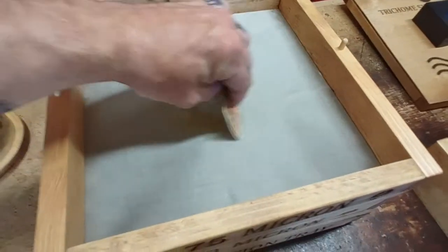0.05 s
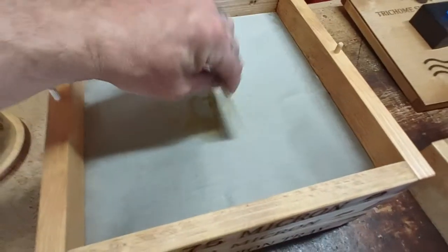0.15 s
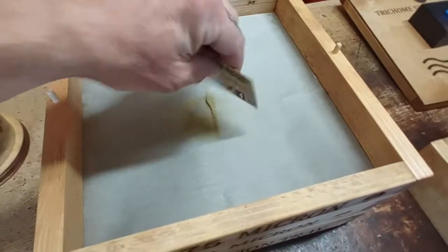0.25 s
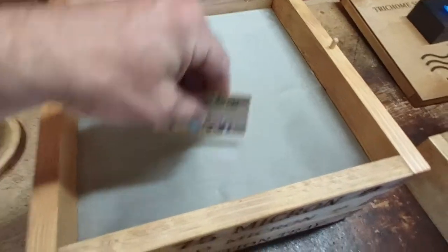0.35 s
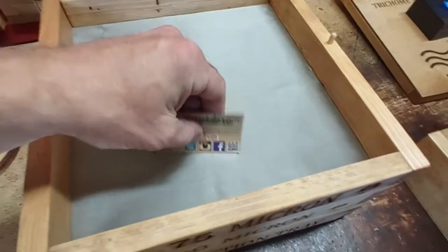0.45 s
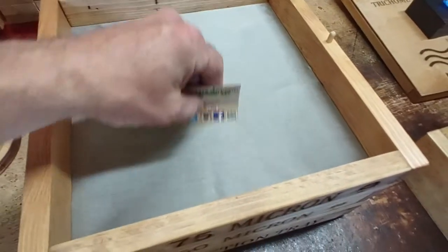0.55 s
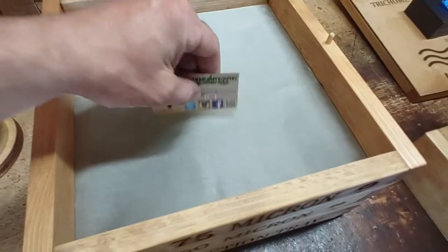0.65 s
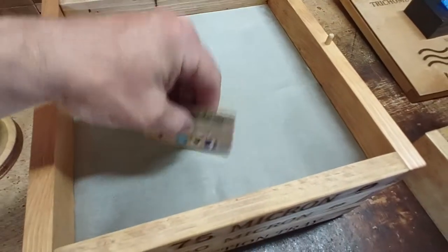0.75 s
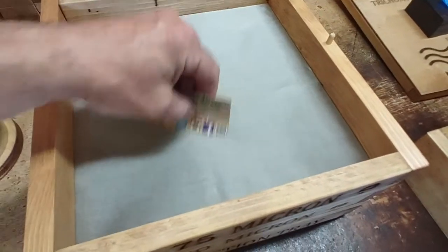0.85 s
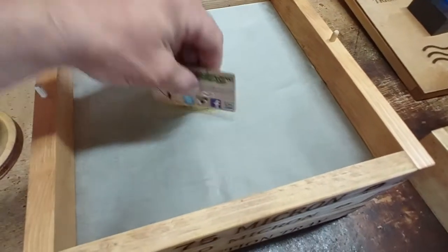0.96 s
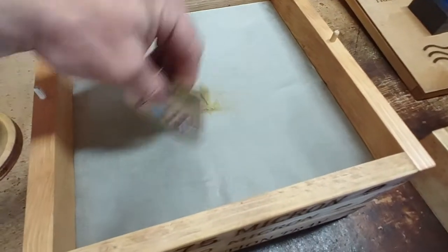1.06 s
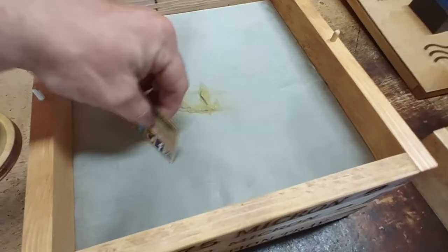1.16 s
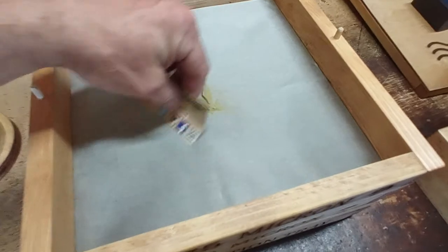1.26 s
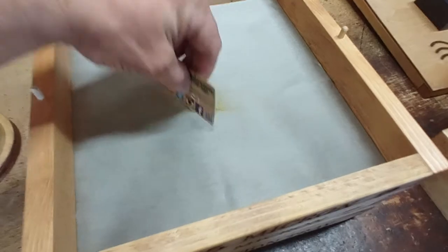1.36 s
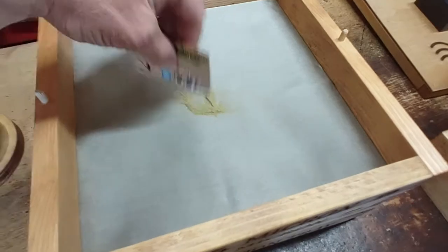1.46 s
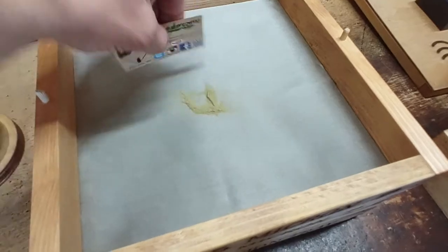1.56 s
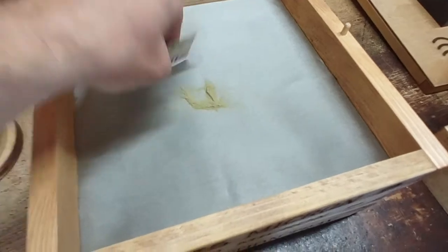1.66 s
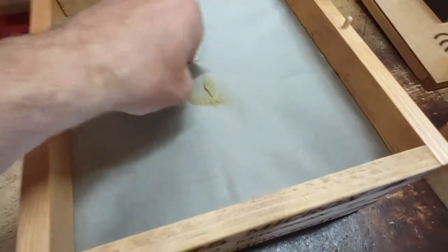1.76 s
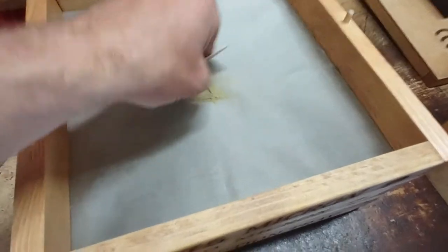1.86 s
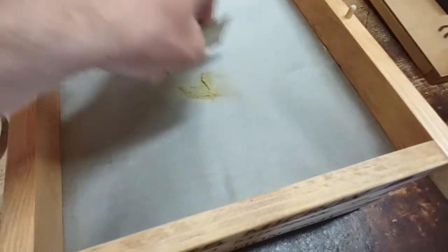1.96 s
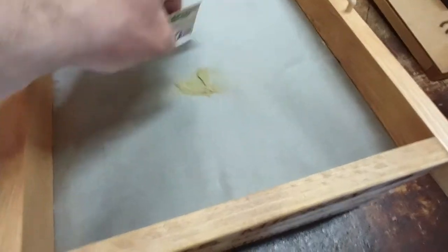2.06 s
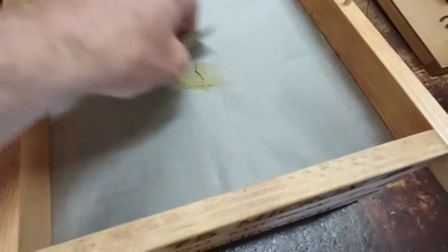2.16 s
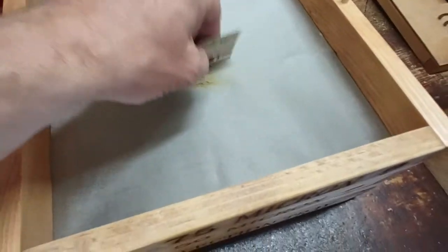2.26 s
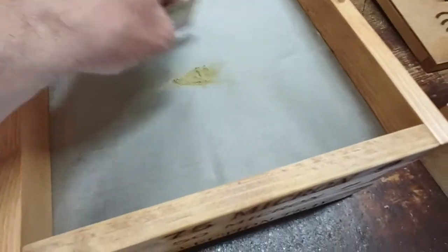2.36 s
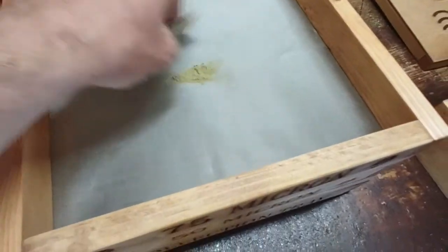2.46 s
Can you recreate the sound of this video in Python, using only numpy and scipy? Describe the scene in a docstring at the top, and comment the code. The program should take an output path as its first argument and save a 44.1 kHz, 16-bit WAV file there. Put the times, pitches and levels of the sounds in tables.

```python
"""A thin high hiss comes and goes over a low room hum; then a stiff card sweeps six times over a fine mesh.
The mesh is stretched in a wooden frame, close by in a small room. The rasp is made of dense random clicks,
the card's edge catching on wires, coloured by the resonances of card and screen; the screen booms along.
Light touches are short bursts of the same clicks, and soft bumps ring the low modes of the frame.
The hiss and the room noise are filtered noise, and the hum is three wavering tones."""
import sys
import numpy as np
from scipy import signal
from scipy.fft import rfft, irfft
from scipy.io import wavfile

SR = 44100
rng = np.random.default_rng(int(sys.argv[2]) if len(sys.argv) > 2 else 0)


def int16_out(signal):
    """Quantize to a 16-bit WAV file."""
    q = np.round(np.clip(np.atleast_2d(signal).T, -1, 1) * 32767)
    wavfile.write(sys.argv[1], SR, q.astype(np.int16))


N = 112455
T = np.arange(N) / SR   # time in seconds
HZ = np.maximum(np.arange(N // 2 + 1) * SR / N, 1)   # every frequency of the spectrum
SPLIT_HZ = 3350   # body below, treble above
TREBLE_HZ = 7000   # start of the top shelf


# How strongly the card rasps, one curve for each sweep.
# Each row: time in seconds, body level in dB, treble level in dB (both before the lifts below).
SWEEP_CURVES = [
    [(0.18, -43.5, -61.5), (0.19, -50.5, -46.5), (0.202, -33.5, -30.5), (0.22, -28, -26),
     (0.252, -30.5, -19.5), (0.302, -26.5, -26), (0.34, -56, -56.5)],
    [(0.52, -48, -54), (0.528, -49.5, -47), (0.546, -31, -25), (0.568, -29.5, -18.5), (0.61, -30, -19),
     (0.622, -30, -30), (0.665, -53, -58.5)],
    [(0.87, -49, -62), (0.918, -31.5, -31), (0.966, -32.5, -24), (1.022, -30.5, -28), (1.046, -32, -27),
     (1.06, -34.5, -36.5), (1.082, -47, -63.5), (1.095, -70, -50)],
    [(1.445, -72, -82), (1.465, -42, -44), (1.491, -34.5, -32), (1.523, -36, -36), (1.583, -37.5, -25.5),
     (1.613, -37, -25), (1.621, -37.5, -32), (1.635, -42.5, -48), (1.66, -58, -56.5)],
    [(1.82, -53.5, -58.5), (1.844, -53, -56), (1.862, -41.5, -35.5), (1.878, -38, -30), (1.924, -31, -25),
     (1.95, -32, -27.5), (1.968, -29, -33), (2.005, -52.5, -63)],
    [(2.14, -67, -78), (2.15, -47.5, -62.5), (2.166, -40.5, -34.5), (2.196, -40, -26), (2.264, -33.5, -33),
     (2.278, -46, -56), (2.295, -63, -55)],
]
# How the card is held, one row for each sweep.
# Each row: screen belly lift in dB, screen ring pitch in Hz, ring lift in dB, card pitch in Hz,
# card lift in dB, top lift in dB, left over right in dB.
CARD_GRIPS = [(7.5, 1315, 8.5, 2180, 3.5, -1.5, 0), (5, 1370, 9, 2280, 5, 0, 1),
              (5, 1480, 2, 3700, 4, 2.5, 3), (2, 1500, 2, 2430, 7.5, -1, 1),
              (7.5, 1370, 1, 4400, 9, -1, -1), (-1.5, 1530, 7, 2350, 3.5, -0.5, 0)]
BODY_LIFT_DB, TREBLE_LIFT_DB = 6.5, 5
BELLY_HZ, BELLY_WIDTH_HZ = 880, 240
RING_WIDTH_HZ, CARD_WIDTH_HZ = 120, 550


def sweeps(body_db):
    """Each sweep drives card and screen with wire catches; the grip sets its colour."""
    rasp = shifting(catches())
    high = colour(rasp, above(SPLIT_HZ))
    low = rasp - high
    spectrum = 0
    for curve, grip in zip(SWEEP_CURVES, CARD_GRIPS):
        belly_db, ring_hz, ring_db, card_hz, card_db, top_db, pan_db = grip
        body, treble = along(curve)
        drive = amp(BODY_LIFT_DB) * body * low + amp(TREBLE_LIFT_DB) * treble * high
        grip_db = belly_db * bell(BELLY_HZ, BELLY_WIDTH_HZ)
        grip_db = grip_db + ring_db * bell(ring_hz, RING_WIDTH_HZ)
        grip_db = grip_db + card_db * bell(card_hz, CARD_WIDTH_HZ)
        grip_db = grip_db + top_db * above(TREBLE_HZ)
        spectrum = spectrum + rfft(drive) * at_ports(body_db + grip_db, pan_db)
    return irfft(spectrum, N)


EDGE_FADE_S = 0.006


def along(curve):
    """Body and treble gains over time from a sweep's curve, fading to silence outside it."""
    s, *levels = np.transpose(curve)
    to_nearest_end = np.minimum(T - s[0], s[-1] - T)
    inside = np.clip(1 + to_nearest_end / EDGE_FADE_S, 0, 1)
    return [amp(np.interp(T, s, db)) * inside for db in levels]


CATCHES_PER_S, CATCH_SPREAD_DB = 14000, 2
JUDDER_DB, JUDDER_PER_S = 0.51, 90   # spread of the unsteadiness, and how fast it can change


def catches():
    """The edge snaps over wires: dense clicks of uneven size, juddering a little."""
    # one shared stream of clicks and one more for each side
    size_db = CATCH_SPREAD_DB * np.minimum(rng.exponential(1, (3, N)), 4)
    direction = rng.choice([-1, 1], (3, N))
    caught = rng.random((3, N)) < CATCHES_PER_S / SR
    clicks = amp(size_db) * direction * caught
    judder = amp(JUDDER_DB * drift(JUDDER_PER_S))
    return rms_one(pair_up(clicks) * judder)


SHIFT_DB, SHIFT_WIDTH_HZ, SHIFT_S = 5.5, 182, 0.027   # greatest swing, width of a patch, its duration


def shifting(x):
    """Narrow bands swell and sink, each by its own chance."""
    hz, s, cells = signal.stft(x, SR, nperseg=512, noverlap=384)
    chance = rng.standard_normal(cells.shape[1:])
    chance = smooth(chance, SHIFT_WIDTH_HZ / hz[1], axis=0)
    chance = smooth(chance, SHIFT_S / s[1], axis=1)
    swung = cells * amp(SHIFT_DB * np.tanh(chance))
    return rms_one(signal.istft(swung, SR, nperseg=512, noverlap=384)[1][:, :N])


# Broad colour of the rasp. Each row: frequency in Hz, relative level in dB per Hz.
RASP_COLOUR = [(150, -62.5), (330, -20.5), (480, -14), (800, -9.5), (1050, -13), (1400, -0.5), (2800, 3.5),
               (4800, -3.5), (6500, -3), (9300, -7.5), (11200, -1), (12400, -12.5), (13300, -24),
               (15800, -30)]
# Narrow resonances of card and screen.
# Each row: frequency in Hz, width in Hz (narrow ones are widened to MIN_WIDTH_HZ), lift in dB.
CARD_AND_SCREEN_MODES = [(518, 41, 6), (710, 30, 7), (1343, 76, 4), (2114, 96, 5), (2586, 47, 3.5),
                         (2960, 200, 2.5), (3450, 16, 2.5), (3980, 150, 2), (4890, 55, 6.5), (5370, 310, 8),
                         (6100, 73, -0.5), (7135, 180, 6), (8606, 270, 10)]
MESH_RIPPLE_DB = 1.38


def card_and_screen_body():
    """Colour in dB: a broad curve, narrow resonances and the ripple of the mesh's many close modes."""
    resonances_db = sum(db * bell(hz, width_hz) for hz, width_hz, db in CARD_AND_SCREEN_MODES)
    return over_hz(RASP_COLOUR) + resonances_db + MESH_RIPPLE_DB * ripple()


MODE_SPACING_HZ = 28


def ripple():
    """Random peaks and dips over frequency, like many close modes; spread 1."""
    return smooth(rng.standard_normal(len(HZ)), MODE_SPACING_HZ * N / SR, axis=0)


# The boom of the screen, one row for each sweep.
# Each row: start pitch in Hz, end pitch in Hz, level against the sweep's body curve in dB,
# left over right in dB.
BOOM_GLIDES = [(420.3, 800, -17, 2.5), (524, 920, -19.5, 13), (509, 820, -14.5, 20),
               (1040, 900, -16.5, -13), (678, 830, -13.5, -0.5), (640, 860, -14, -6)]
BOOM_WIDTH_HZ = 177


def screen_booms():
    """The stretched screen drums under the card; its pitch glides as the edge crosses it."""
    out = 0
    for curve, (start_hz, end_hz, db, pan_db) in zip(SWEEP_CURVES, BOOM_GLIDES):
        start_s, end_s = curve[0][0], curve[-1][0]
        pitch = np.interp(T, [start_s, end_s], [start_hz, end_hz])
        body, _ = along(curve)
        out = out + amp(db) * body * rubbed_mode(pitch, BOOM_WIDTH_HZ) * pan(pan_db)
    return out


def rubbed_mode(hz, width_hz):
    """A randomly driven resonance whose pitch may glide: two drifting waves a quarter turn apart."""
    phase = 2 * np.pi * np.cumsum(hz * np.ones(N)) / SR
    return drift(width_hz / 2) * np.cos(phase) + drift(width_hz / 2) * np.sin(phase)


# Light touches of the card.
# Each row: start in seconds, relative level in dB, rise in seconds, decay in seconds,
# treble lift in dB, ring pitch in Hz, ring lift in dB.
LIGHT_TOUCHES = [(0.509, -42, 0.0013, 0.01, -2.5, 2200, 5.5), (0.843, -49.5, 0.0026, 0.016, -4, 1740, 14.5),
                 (1.34, -39.5, 0.0044, 0.0064, -0.5, 2190, 14.5), (1.398, -34.5, .002, .010, -9.5, 2070, 9),
                 (1.416, -40, 0.0015, 0.0066, -25, 2270, -6), (1.616, -20.5, 0.00088, 0.0022, -1, 2330, 9),
                 (1.813, -42.5, 0.0018, 0.017, -20.5, 1700, -7),
                 (2.148, -39.5, 0.0037, .014, -14, 2030, 15), (2.359, -62, 0.0017, 0.012, 7, 10840, 16)]
TOUCH_WIDTH_HZ = 600
HOLLOW_HZ, HOLLOW_WIDTH_HZ, HOLLOW_DB = 3400, 1300, -7   # a light touch leaves the upper mids hollow


def touches(body_db):
    """Brief grazes into the same body, each with a ring colour of its own."""
    rasp = catches()
    spectrum = 0
    for s, db, rise_s, decay_s, treble_db, ring_hz, ring_db in LIGHT_TOUCHES:
        tint_db = treble_db * above(SPLIT_HZ) + ring_db * bell(ring_hz, TOUCH_WIDTH_HZ)
        tint_db = tint_db + HOLLOW_DB * bell(HOLLOW_HZ, HOLLOW_WIDTH_HZ)
        graze = 2 * swell(s, rise_s, decay_s) * rasp
        spectrum = spectrum + rfft(graze) * causal(db + tint_db)
    return irfft(spectrum * at_ports(body_db, pan_db=0.5), N)


# Faint narrow rings of the card. Each row: start in seconds, pitch in Hz, level in dB before its swell.
CARD_RINGS = [(0.659, 2440, -49)]
AFTER_RISE_S, AFTER_DECAY_S = 0.013, 0.044
AFTER_WIDTH_HZ, AFTER_PAN_DB = 220, -7   # the pan leans right


def after_rings():
    """A faint narrow ring outlasts a sweep."""
    rings = 0
    for s, hz, db in CARD_RINGS:
        envelope = amp(db) * swell(s, AFTER_RISE_S, AFTER_DECAY_S)
        rings = rings + envelope * rubbed_mode(hz, AFTER_WIDTH_HZ)
    return pan(AFTER_PAN_DB) * rings


# Soft bumps of the frame. Each row: start in seconds, relative level in dB.
FRAME_KNOCKS = [(1.403, -49.5), (1.42, -46), (1.434, -47)]
# Modes of the wooden frame.
# Each row: pitch in Hz, relative level in dB, time to die away by 60 dB in seconds.
FRAME_MODES = [(116, -2.5, 0.23), (207, -6, 0.13), (259, 4.5, .09), (350, -2, 0.048), (509, 0, 0.093)]
BUMP_RISE_S, BUMP_SPREAD_DB = 0.0012, 2.6


def frame_bumps():
    """Soft knocks ring the low modes of the wooden frame, each mode by a slightly random amount."""
    out = 0
    for s, db in FRAME_KNOCKS:
        for hz, mode_db, t60 in FRAME_MODES:
            level = amp(db + mode_db + rng.normal(0, BUMP_SPREAD_DB))
            envelope = swell(s, BUMP_RISE_S, t60 / np.log(1000))
            out = out + level * envelope * np.sin(2 * np.pi * hz * (T - s))
    return out


# The two microphone ports hear the screen differently.
# Each row: frequency in Hz, left over right in dB.
PORT_BALANCE = [(400, -4), (740, 7.5), (1200, -5), (2100, -13.5), (3300, -4.5), (4700, 0.5), (6000, -3),
                (8400, -19), (9300, 2.5), (10100, 12), (11500, 11.5), (13000, 4.5), (15000, -7.5)]
LEFT_LEAD_S = 0.0002   # the left side hears it this much earlier


def at_ports(body_db, pan_db):
    """Response from the card's edge to each microphone port, of unit power."""
    lead = np.exp(2j * np.pi * HZ * LEFT_LEAD_S * np.array([[.5], [-.5]]))
    body = causal(body_db) / np.sqrt(np.mean(amp(body_db) ** 2))
    return body * pan(over_hz(PORT_BALANCE) + pan_db) * lead


ROOM_DB, ROOM_T60_S, ROOM_DULL_HZ, ROOM_DELAY_S = -27.5, 0.32, 3800, 0.002


def room(x):
    """A short, dull, diffuse tail on each side: decaying filtered noise."""
    dull_noise = colour(rng.standard_normal((2, N)), 1 / np.hypot(1, HZ / ROOM_DULL_HZ))
    tail = dull_noise * amp(-60 * T / ROOM_T60_S) * (T > ROOM_DELAY_S)
    tail = rms_one(tail[:, :SR]) / np.sqrt(SR)   # unit energy in one second
    return amp(ROOM_DB) * signal.fftconvolve(x, tail, axes=1)[:, :N]


# How loud the thin hiss is. Each row: time in seconds, level in dB before its slight wavering.
HISS_CURVE = [(0, -48), (.07, -54.5), (.17, -44), (.36, -55), (.44, -58), (.52, -52), (.68, -63.5),
              (.81, -63.5), (.86, -49), (1.1, -47.5), (1.25, -49), (1.45, -44.5), (1.66, -48), (1.77, -56),
              (1.85, -48.5), (2.02, -61), (2.12, -70.5), (2.5, -84)]
# Its colour. Each row: frequency in Hz, relative level in dB per Hz, before a random ripple.
HISS_COLOUR = [(1500, -27.5), (2400, -22), (4000, -29), (5500, -18.5), (7500, -22.5), (8700, -16.5),
               (9600, -23), (10250, 0), (10850, -9.5), (11350, 0.5), (11700, -6.5), (12200, -12.5),
               (13200, -23.5), (15800, -28.5)]
HISS_PAN_DB, HISS_RIPPLE_DB = 10, 3
HISS_WAVER_DB, HISS_WAVER_PER_S = 1.7, 25


def thin_hiss():
    """A faint, slightly uneven hiss near 11 kHz, mostly on the left, made of filtered noise."""
    sides = pan(over_hz(PORT_BALANCE) + HISS_PAN_DB * above(TREBLE_HZ))
    tint = amp(over_hz(HISS_COLOUR) + HISS_RIPPLE_DB * ripple())
    noise = colour(shifting(rng.standard_normal((2, N))), tint * sides)
    level_db = np.interp(T, *np.transpose(HISS_CURVE)) + HISS_WAVER_DB * drift(HISS_WAVER_PER_S)
    return rms_one(noise) * amp(level_db)


# Colour of the room noise. Each row: frequency in Hz, relative level in dB per Hz.
ROOM_NOISE_COLOUR = [(25, -28), (60, -3), (120, 0.5), (230, -2), (400, -0.5), (600, -4.5), (1000, -12.5),
                     (2200, -15.5), (4000, -27.5), (8000, -34.5), (15000, -46.5)]
# How loud it is. Each row: time in seconds, level in dB.
ROOM_NOISE_CURVE = [(0, -60.5), (1.1, -62), (1.5, -57), (2.1, -59), (2.5, -57)]
# Tones of the hum. Each row: pitch in Hz, level in dB.
HUM_TONES = [(59.5, -77), (113, -69.5), (221, -71.5)]


def background():
    """Low filtered room noise with a hum of tones whose phase wavers."""
    noise = rms_one(colour(pair_up(rng.standard_normal((3, N))), amp(over_hz(ROOM_NOISE_COLOUR))))
    hum = 0
    for hz, db in HUM_TONES:
        phase = 2 * np.pi * hz * T + 0.7 * drift(4)
        hum = hum + amp(db) * np.sqrt(2) * np.sin(phase)
    return amp(np.interp(T, *np.transpose(ROOM_NOISE_CURVE))) * noise + hum


# How alike the two sides sound. Each row: frequency in Hz, shared part of the power from 0 to 1.
SIDE_LIKENESS = [(80, 1), (250, 0.8), (1000, 0.58), (3000, 0.55), (12000, 0.34)]


def pair_up(three):
    """One shared and two separate signals make a stereo pair, less alike towards the treble."""
    share = np.clip(over_hz(SIDE_LIKENESS), 0, 1)
    return colour(three[0], np.sqrt(share)) + colour(three[1:], np.sqrt(1 - share))


def amp(db):
    """Decibels to gain."""
    return 10 ** (np.asarray(db) / 20)


def rms_one(x):
    """Scale to unit rms."""
    return x / np.sqrt(np.mean(x ** 2) + 1e-20)


def over_hz(points):
    """A table of (Hz, value) spread over all frequencies."""
    hz, value = np.transpose(points)
    return np.interp(np.log(HZ), np.log(hz), value)


MIN_WIDTH_HZ = 70


def bell(hz, width_hz):
    """Shape of a resonance over frequency, 1 on top and never narrower than MIN_WIDTH_HZ."""
    half_width = max(width_hz, MIN_WIDTH_HZ) / 2
    return 1 / (1 + ((HZ - hz) / half_width) ** 2)


def above(hz):
    """Smooth shelf from 0 below to 1 above a frequency."""
    return 1 / (1 + (hz / HZ) ** 4)


def colour(x, gain):
    """Filter by a gain for each frequency."""
    return irfft(rfft(x) * gain, N)


def causal(db):
    """Minimum-phase response with these gains, so that resonances ring only after their cause."""
    cepstrum = irfft(np.log(amp(db)), N)
    return np.exp(rfft(cepstrum * (1 + np.sign(np.fft.fftfreq(N)))))


def pan(db):
    """Left and right gains of constant power, for a left-over-right level in dB."""
    pair = amp(np.array([[.5], [-.5]]) * db)
    return pair / np.sqrt(np.mean(pair ** 2, axis=0))


def drift(rate):
    """Slow chance with spread 1: noise kept below `rate` in Hz."""
    return rms_one(colour(rng.standard_normal(N), 1 - above(rate)))


def smooth(x, span, axis):
    """Blur over about `span` steps along an axis; rms 1."""
    size = x.shape[axis]
    keep = np.exp(-(2 * span * np.fft.rfftfreq(size)) ** 2)
    blurred = irfft(rfft(np.swapaxes(x, axis, -1)) * keep, size)
    return rms_one(blurred.swapaxes(axis, -1))


def swell(s, rise_s, decay_s):
    """A quick rise and an exponential decay."""
    age = np.maximum(T - s, 0)
    return (1 - np.exp(-age / rise_s)) * np.exp(-np.minimum(age / decay_s, 20))


def scene():
    """Card, screen and frame in the room, with the hiss and the background."""
    body_db = card_and_screen_body()
    work = sweeps(body_db) + screen_booms() + touches(body_db) + after_rings() + frame_bumps()
    return work + room(work) + thin_hiss() + background()


def record(dry):
    """Everything from 15750 Hz upwards is cut off steeply."""
    return colour(dry, HZ < 15750)


dry = scene()
out = record(dry)
int16_out(out)
```